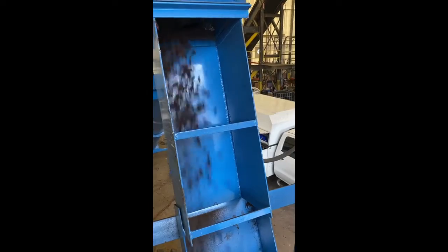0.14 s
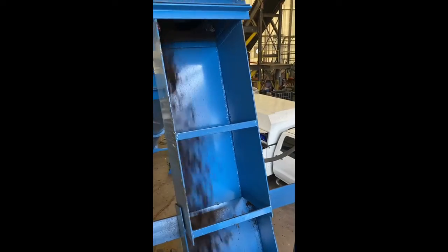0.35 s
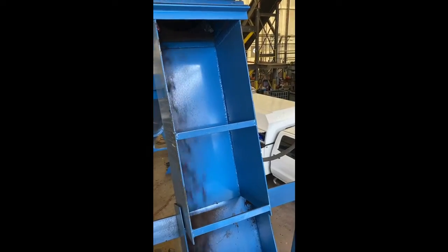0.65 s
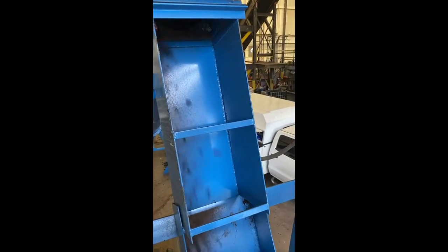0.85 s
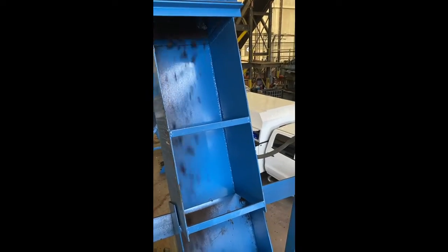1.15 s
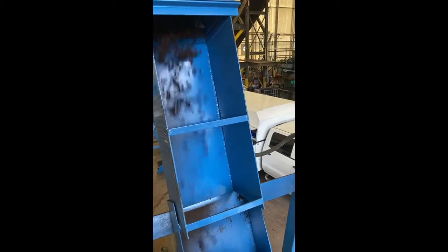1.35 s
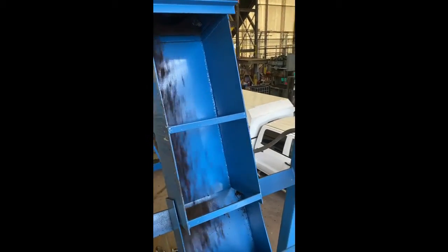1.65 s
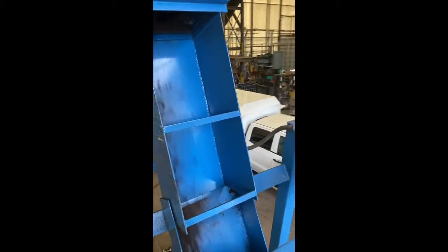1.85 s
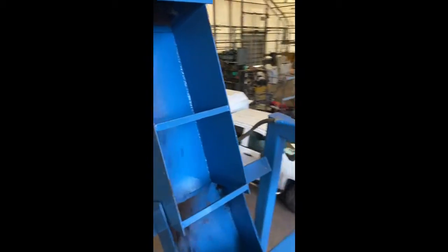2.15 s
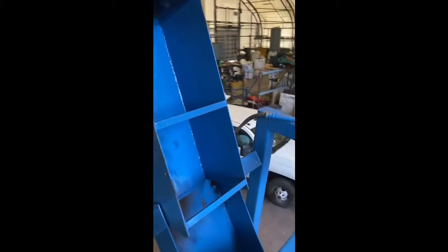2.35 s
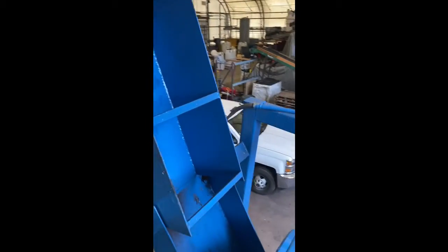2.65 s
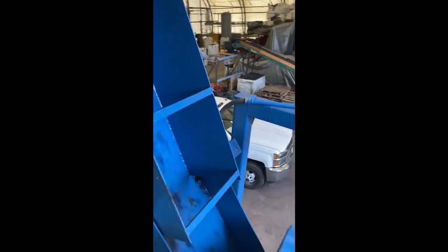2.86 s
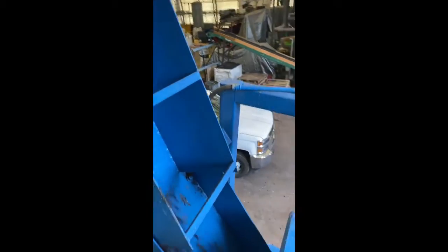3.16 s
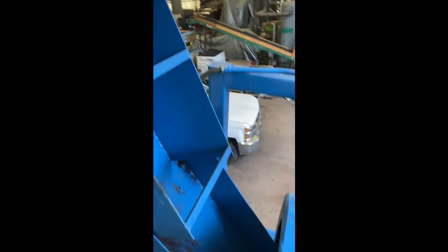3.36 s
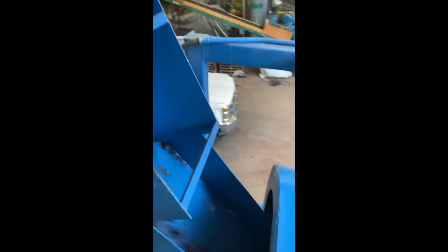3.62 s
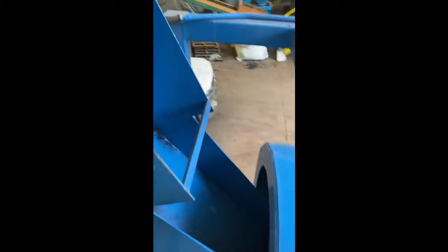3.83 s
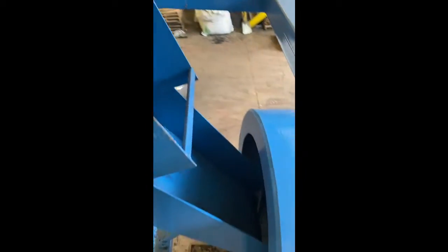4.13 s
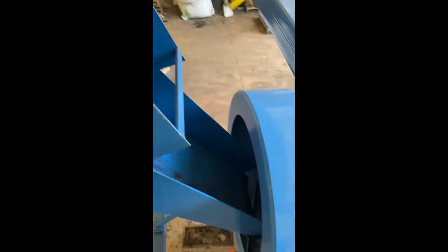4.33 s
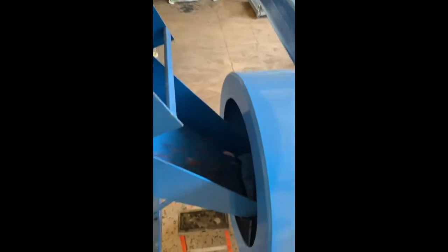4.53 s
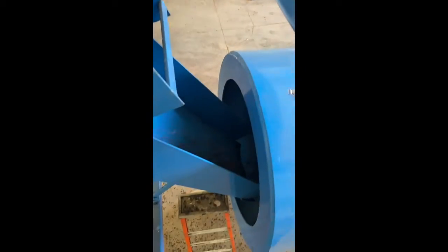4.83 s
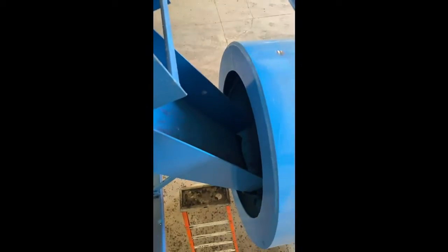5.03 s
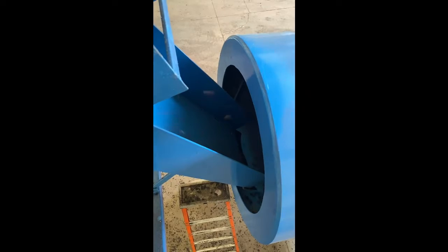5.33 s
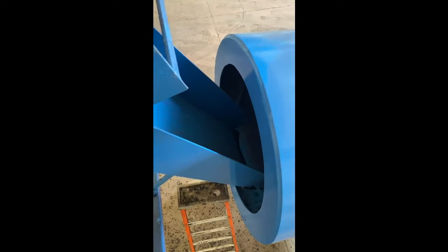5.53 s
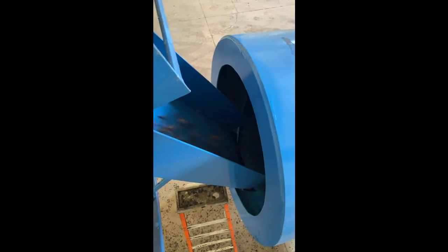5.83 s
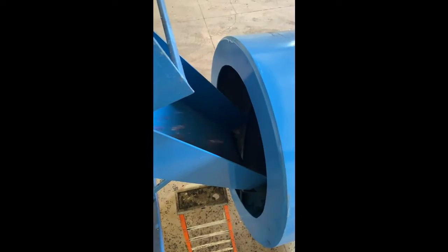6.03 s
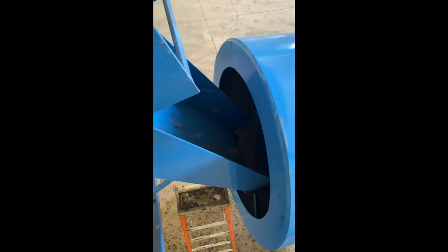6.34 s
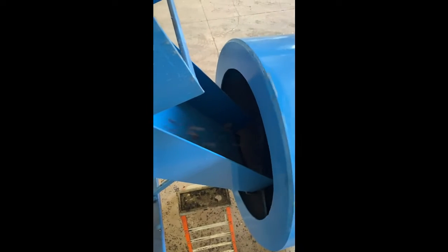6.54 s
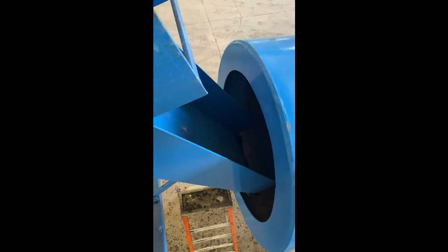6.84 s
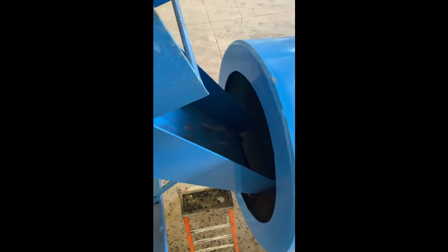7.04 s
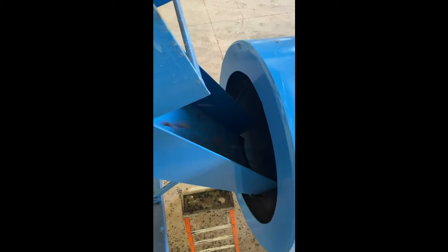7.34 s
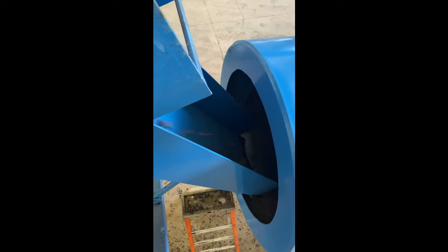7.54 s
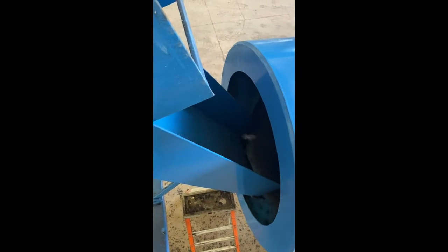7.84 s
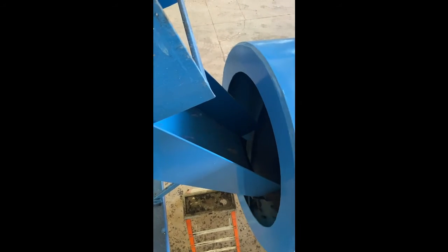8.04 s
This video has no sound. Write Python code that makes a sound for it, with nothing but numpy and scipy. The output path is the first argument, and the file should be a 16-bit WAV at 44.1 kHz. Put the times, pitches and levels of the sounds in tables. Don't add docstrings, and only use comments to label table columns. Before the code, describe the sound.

Inside a big steel hall, a heavy rotating drum and motors roar without pause, close to the microphone. Loose material spills on a steel chute in short hissing showers with constant fine rattling. Lumps clank early on, again just past the middle, and hardest near six seconds, each with a dry ring and short squeal. Thin whistles flicker between them. The microphone moves from chute to drum mouth, where grinding and hollow rumble grow slightly.

```python
import sys
import numpy as np
from scipy import signal
from scipy.fft import rfft, irfft, next_fast_len
from scipy.io import wavfile
from scipy.ndimage import uniform_filter1d

SR = 44100
rng = np.random.default_rng(int(sys.argv[2]) if len(sys.argv) > 2 else 0)


def inscribe(sig):
    pcm = np.round(np.clip(np.atleast_2d(sig).T, -1, 1) * 32767)
    wavfile.write(sys.argv[1], SR, pcm.astype(np.int16))


def nominal_scale(level):
    x = np.asarray(level, float) / 20
    return 10 ** x


N = 360738
SIZE = next_fast_len(N + SR)
HZ = np.arange(SIZE // 2 + 1) * SR / SIZE + 1e-3

# start in seconds, level in dB, loudest region in Hz, spread in octaves.
KNOCKS = [(0.577, -18, 3900, 0.11), (0.581, -24, 5050, .05), (0.594, -11, 4650, 0.044),
          (0.594, -22, 4400, 0.043), (0.593, -20, 3700, .05), (0.592, -22, 5500, .12),
          (0.592, -22, 5000, 1.1), (0.595, -14, 2650, 0.1), (0.622, -26, 4300, 0.24),
          (0.712, -14, 3700, .04), (0.712, -14, 5030, .04), (0.711, -27, 5900, .1), (0.710, -21, 9250, .03),
          (0.711, -28, 5000, 0.9), (0.821, -25, 6100, 0.41), (4.353, -27, 3600, 0.22),
          (4.405, -19, 3450, 0.24), (4.408, -11, 5340, 0.08), (4.409, -9, 4510, .05),
          (4.42, -14, 4510, .05), (4.404, -20, 9200, .15), (4.409, -9, 3500, 0.15), (4.409, -19, 4000, 1.6),
          (4.43, -17, 5360, .1), (4.426, -15, 3450, .2), (4.445, -17, 3100, .12), (4.494, -17, 3300, .08),
          (4.49, -27, 4500, .08), (6.397, -31, 4500, .4), (6.325, -24, 5050, .08), (6.324, -21, 4400, 0.75)]


def rms_one(x):
    return x / np.sqrt(np.mean(x ** 2) + 1e-20)


def in_time(rows):
    s, *columns = np.transpose(rows)
    return [np.interp(np.arange(N) / SR, s, c) for c in columns]


def at_hz(points):
    hz, value = np.transpose(points)
    return np.interp(np.log(HZ), np.log(hz), value)


def resonances_db(modes):
    return sum(db / (1 + (2 * (HZ - hz) / width) ** 2) for hz, width, db in modes)


def drift(hz):
    r = np.exp(-32 * np.pi * hz / SR)
    slow = signal.lfilter([1], [1, -2 * r, r * r], rng.standard_normal(N // 16 + 1002))[1000:]
    return np.interp(np.arange(N) / 16, np.arange(len(slow)), rms_one(slow))


def pair(two, gain):
    # frequency in Hz, unlike part minus common part in dB.
    alike = [(30, -38), (125, -40), (250, -23), (500, -10.5), (1000, -7.5), (2000, -6), (3000, -4),
             (4500, -3.5), (6000, -20), (7300, -21.5), (15000, -10)]
    unlike = nominal_scale(at_hz(alike))
    common, apart = rfft(two, SIZE) * (gain / np.sqrt(1 + unlike ** 2))
    return irfft(np.array([common + apart * unlike, common - apart * unlike]), SIZE)[:, :N]


def machine_noise(spectrum, flicker_db):
    # frequency in Hz, width in Hz, height in dB.
    shell = [(82, 12, 4), (134, 9, 7), (172, 8, 7), (199, 7, 8), (214, 5, 5), (248, 9, 6), (306, 7, 7),
             (347, 6, 8), (391, 6, 7), (436, 9, 4), (490, 40, -3), (575, 35, 5), (668, 25, 6), (860, 30, 3),
             (1003, 30, 4), (1180, 50, 3), (2300, 90, 2.5), (3680, 110, 3.5), (4100, 120, 3.5)]
    gain = nominal_scale(at_hz(spectrum) + resonances_db(shell))
    noise = rms_one(pair(rng.standard_normal((2, N)), gain))
    return noise * nominal_scale(flicker_db * drift(10.7))


def layer_gain(mean_db, share, near_db, centre_hz):
    # time in seconds, level in dB.
    churn = [(0.0, -23.5), (0.7, -22), (0.91, -23), (1.62, -22), (3.03, -22.5), (3.65, -21.5),
             (4.26, -22.5), (4.37, -19.5), (4.47, -22.5), (4.81, -23), (4.94, -21), (5.63, -22.5),
             (6.13, -22.5), (6.47, -20), (7.15, -22.5), (7.54, -24), (7.88, -24), (8.18, -23.5)]
    # middle in seconds, width in seconds, level in dB, loudest region in Hz.
    heaps = [(0.998, 0.042, -8, 300), (1.25, 0.07, -1, 2500), (2.65, 0.035, 6, 696), (3.3, 0.17, 1.5, 1090),
             (3.65, .15, 1, 1000), (4.0, 0.28, 3, 170), (5.15, 0.052, -6, 300), (7.1, 0.22, 2, 780),
             (3.5, 0.18, -1, 3500), (7.72, 0.069, 4.5, 181), (.8, 0.22, 1, 190), (2.5, .15, -5, 388),
             (4.35, 0.053, 0, 200), (7.6, 0.085, -0.5, 1100)]
    heap_octaves = 0.8
    churn_db, = in_time(churn)
    near, = in_time([(2.7, 0), (3.2, 1)])
    t = np.linspace(0, N / SR, num=1000)
    heaps_db = np.zeros(len(t))
    for s, width, db, hz in heaps:
        octaves_off = np.log2(hz / centre_hz) / heap_octaves
        heaps_db += db * np.exp(-((t - s) / width) ** 2 - octaves_off ** 2)
    swell_db, = in_time(np.transpose([t, heaps_db]))
    return nominal_scale(mean_db + share * (churn_db - churn_db.mean()) + near_db * near + swell_db)


def drum_rumble():
    # frequency in Hz, level in dB per Hz.
    rumble = [(25, -50), (40, -10), (60, -2), (90, -0.5), (140, 0), (220, -1), (330, -4.5), (500, -9),
              (900, -67)]
    gain = layer_gain(mean_db=-24, share=0.5, near_db=0.4, centre_hz=166)
    return gain * machine_noise(rumble, flicker_db=0.5)


def drum_roar():
    # frequency in Hz, level in dB per Hz.
    roar = [(200, -9.5), (350, -6), (480, -0.5), (650, 0.5), (850, -3), (1200, -14), (2000, -57)]
    gain = layer_gain(mean_db=-28, share=0.63, near_db=0.67, centre_hz=600)
    return gain * machine_noise(roar, flicker_db=0.78)


def gear_noise():
    # frequency in Hz, level in dB per Hz.
    gears = [(500, -17.5), (800, -5), (1100, -0.5), (1500, -1.5), (2200, -5), (3000, -14.5), (4500, -35)]
    gain = layer_gain(mean_db=-28.5, share=0.78, near_db=2.0, centre_hz=1200)
    return gain * machine_noise(gears, flicker_db=1.26)


def sliding_material():
    # frequency in Hz, level in dB per Hz.
    slide = [(1200, -8), (2200, -2), (3200, -0.5), (4300, -1.5), (5500, -8), (7000, -15), (9000, -17),
             (12000, -42), (14000, -41), (15800, -50)]
    gain = layer_gain(mean_db=-32, share=0.44, near_db=0.07, centre_hz=3200)
    return gain * machine_noise(slide, flicker_db=1.05)


def motor_hum():
    # frequency in Hz, level in dB, middle in seconds, half width in seconds.
    crests = [(134, -36, 1.5, 1.0), (134, -36, 3.7, .8), (172, -34, 4.0, .6), (172, -37, 1.2, .8),
              (199, -35, 1.0, .7), (199, -35, 7.1, 1.0), (248, -40, 2.2, .5), (248, -39, 4.1, .4),
              (306, -36, .9, .8), (306, -34, 3.6, .8), (347, -37.5, 1.9, 1.2), (347, -35, 6.3, 1.8),
              (391, -36.5, 1.7, 1.0), (391, -40, 6, 1.2)]
    t = np.arange(N) / SR
    tones = {}
    for hz in sorted({row[0] for row in crests}):
        sway = nominal_scale(1.5 * drift(.8))
        tones[hz] = sway * np.sin(2 * np.pi * hz * t + .5 * drift(1.5))
    return sum(nominal_scale(db) * np.exp(-((t - s) / width) ** 4) * tones[hz] for hz, db, s, width in crests)


def grains(per_s, spread_db):
    sizes = nominal_scale(spread_db * np.minimum(rng.exponential(1, (2, N)), 5))
    sizes = sizes * rng.choice([-1, 1], (2, N))
    return rms_one(sizes * (rng.random((2, N)) < per_s / SR))


def rattle():
    pitches = np.geomspace(600, 7000, num=14)
    ring_cycles, tilt_db = 92, -4.5
    hits = grains(per_s=500, spread_db=3.5)
    dealt = rng.integers(0, len(pitches), N)
    out = 0
    for k, hz in enumerate(pitches):
        r, w = nominal_scale(-60 * hz / (ring_cycles * SR)), 2 * np.pi * hz / SR
        own_hits = hits * (dealt == k) + 1e-18
        soft = signal.lfilter([1, 0, -1], [1, -2 * r ** 3 * np.cos(w), r ** 6], own_hits)
        ring = signal.lfilter([1, 0, -1], [1, -2 * r * np.cos(w), r * r], soft)
        out = out + nominal_scale(tilt_db * np.log2(hz / 1000)) * rms_one(ring)
    return nominal_scale(-33.5) * rms_one(pair(out, 1))


def showers():
    # start in seconds, peak in dB, t60 in seconds.
    loads = [(0.4519, -33, 0.5), (0.5102, -32, 0.97), (0.5921, -25, 0.2), (0.7108, -32, 0.74),
             (0.822, -23, 0.26), (1.1294, -36, 0.54), (1.8744, -26, 0.49), (2.0524, -34, 0.65),
             (2.1755, -34.5, 0.83), (2.4428, -33.5, 0.56), (2.9994, -37, 1), (3.6262, -44, 0.6),
             (3.9908, -35.5, 0.5), (4.1784, -38, 0.93), (4.3445, -32, 0.48), (4.4044, -17.5, 0.3),
             (4.5794, -29.5, 0.57), (4.6758, -31, 0.79), (4.8359, -34, 0.7), (5.3613, -29, 1),
             (5.726, -29, 0.63), (6.135, -36, 0.33), (6.2921, -31, 0.5), (6.324, -19.5, 0.37),
             (6.4672, -31.5, 1), (6.6199, -27, 0.26), (6.9576, -29, 0.2), (7.199, -32, 0.46),
             (7.4917, -31, 0.41), (7.7258, -38, 0.5)]
    # start in seconds, peak in dB.
    ticks = [(1.34, -33), (1.567, -36), (3.199, -34), (2.401, -37), (2.837, -37), (3.4, -39), (3.439, -35),
             (4.857, -34), (7.361, -38), (3.715, -35), (5.04, -31), (5.314, -36), (6.0, -28), (6.04, -30),
             (6.396, -23), (6.816, -29), (6.859, -30.5), (6.904, -31), (2.53, -36), (4.732, -35),
             (5.634, -35), (7.225, -29), (7.18, -37), (7.406, -31), (7.636, -35)]
    # frequency in Hz, level in dB per Hz.
    colour = [(1500, 2.5), (3000, 4.5), (5000, 3.5), (7000, 0.5), (10000, 0), (13000, -5.5), (16000, -10)]
    load_rise_s, tick_rise_s, tick_t60_s = .0031, .0006, 0.05
    trickle_db = -49.5
    falls = [(*row, load_rise_s) for row in loads]
    falls += [(*row, tick_t60_s, tick_rise_s) for row in ticks]
    power, after = np.zeros(N), np.arange(SR) / SR
    for s, db, t60, rise in falls:
        part = power[int(s * SR):][:SR]
        burst = nominal_scale(2 * db - 120 * after / max(t60, .02)) * (1 - np.exp(-after / rise))
        part += burst[:len(part)]
    stray_db = -46 + 3.5 * np.clip(rng.standard_normal(N), -2, 2)
    strays = (rng.random(N) < 22.0 / SR) * nominal_scale(2 * stray_db)
    strays = signal.lfilter([1], [1, -np.exp(-1 / (0.0034 * SR))], strays + 1e-18)
    power = power + nominal_scale(2 * trickle_db) + strays
    hiss = rms_one(pair(grains(per_s=5000., spread_db=-1.0), nominal_scale(at_hz(colour))))
    return hiss * np.sqrt(power) * nominal_scale(0.9 * drift(40))


def bearing_whistles():
    # start in seconds, length in seconds, first pitch in Hz, last pitch in Hz, peak in dB.
    glides = [(0.548, 0.11, 8950, 8550, -36.5), (2.246, 0.42, 4080, 4000, -39),
              (3.004, .3, 4070, 4070, -40), (3.26, 0.28, 3650, 3700, -38), (3.68, .11, 3700, 3660, -39),
              (3.515, .03, 3720, 3700, -33), (3.55, .06, 3700, 3680, -38), (3.92, .03, 4120, 4080, -36),
              (2.5, .04, 4250, 4310, -36), (2.55, .2, 3680, 3600, -40), (3.05, 0.18, 3720, 3920, -43),
              (4.05, .15, 4100, 4150, -48), (2.683, 0.098, 11600, 11300, -36),
              (2.71, 0.17, 10600, 10500, -42.5), (2.743, 0.05, 10350, 9900, -36),
              (5.324, 0.11, 7060, 8000, -37), (5.388, .11, 7950, 7200, -26), (5.93, 0.052, 4100, 4000, -26),
              (6, .03, 4080, 4060, -35), (6.044, .015, 4100, 4040, -30), (5.966, .016, 6050, 5950, -28),
              (5.982, 0.055, 5800, 5500, -30), (5.858, .025, 4080, 4080, -35), (6.07, .03, 3950, 3750, -33),
              (6.0, .035, 4900, 4750, -37), (6.038, 0.055, 5650, 5900, -36), (4.27, 0.037, 3650, 3600, -42),
              (4.311, 0.029, 4050, 4220, -39), (4.804, .06, 3700, 3720, -27)]
    glide_bend = .7
    core = .5
    out = np.zeros(N)
    breath = (core + .6 * (drift(330) + 1j * drift(330))) * nominal_scale(2.5 * drift(35))
    for s, length, first_hz, last_hz, db in glides:
        i = np.arange(int(s * SR), int((s + length) * SR))
        u = np.linspace(0, 1, len(i))
        phase = 2 * np.pi * np.cumsum(first_hz + (last_hz - first_hz) * u ** glide_bend) / SR
        swell_db = np.interp(u, [0, 0.11, 1], [-1, 0, -2.5])
        edges = np.minimum(1, 12 * np.minimum(u, 1 - u))
        out[i] += edges * nominal_scale(db + swell_db) * np.real(breath[i] * np.exp(1j * phase))
    return out


def ringing_sheet():
    # frequency in Hz, level in dB, t60 in seconds.
    sheet = [(2540, -3, 0.039), (3072, -3, 0.1), (3304, -7.5, 0.058), (3555, -3, 0.076), (3700, -7, 0.068),
             (4050, -14, 0.03), (4400, 1, 0.045), (4510, -1, 0.054), (4650, -4, 0.034), (5050, -3, 0.041),
             (5390, 2, 0.04), (5900, 0, 0.035), (6360, -7, 0.045), (6740, 1, .05), (7700, -1, .04),
             (8670, -0.5, 0.062), (9250, -6, .05), (11300, -11, .04)]
    s, db, centre_hz, octaves = np.transpose(KNOCKS)
    starts = (s * SR).astype(int)
    chance_db = rng.normal(0, 1.5, (len(s), len(sheet)))
    out, t = np.zeros(N), np.arange(SR // 20) / SR
    for k, (hz, level_db, t60) in enumerate(sheet):
        force = np.zeros(N)
        off_region = np.log2(hz / centre_hz) / octaves
        strength = nominal_scale(db + level_db + chance_db[:, k] - 8.0 * off_region ** 2)
        for start, gain, scuff in zip(starts, strength, rng.standard_normal((len(s), len(t)))):
            scuff = scuff * np.exp(-t / 0.0055)
            push = abs(scuff @ np.exp(2j * np.pi * hz * t))
            force[start:start + len(t)] += gain * scuff / np.hypot(push, 5.0)
        r, w = nominal_scale(-60 / (t60 * SR)), 2 * np.pi * hz / SR
        out += signal.lfilter([0, np.sin(w)], [1, -2 * r * np.cos(w), r * r], force + 1e-18)
    return out


def crumbling_lumps():
    crunch_db, crunch_s, crunch_octaves = -14, 0.024, 0.3
    out, t = np.zeros(N), np.arange(SR // 8) / SR
    for (s, db, centre_hz, octaves), grit in zip(KNOCKS, rng.standard_normal((len(KNOCKS), len(t)))):
        edges = centre_hz * 2. ** (np.array([-1, 1]) * (crunch_octaves + octaves / 2))
        band = signal.butter(2, edges, "band", fs=SR, output="sos")
        grit = rms_one(signal.sosfilt(band, grit))
        decay = np.exp(-t / crunch_s) * np.minimum(1, t / .002)
        out[int(s * SR):][:len(t)] += nominal_scale(db + crunch_db) * grit * decay
    return out


def squeaks():
    # start in seconds, length in seconds, pitch in Hz, pitch change in %, level in dB.
    bites = [
        (0.8105, 0.022, 2484, 1, -11.5),
        (0.831, .03, 2485, 0, -27),
        (4.399, 0.022, 2320, -4, -12),
        (6.315, 0.027, 2330, -3, -9.5),
        (6.342, 0.022, 2240, 0, -27),
        (6.374, 0.022, 2270, -1, -32),
    ]
    # start in seconds, length in seconds, pitch in Hz, pitch change in %, level in dB.
    squeals = [(0.586, 0.03, 2410, 0, -26), (0.612, 0.028, 2380, -3.5, -26), (0.636, .018, 2380, -2, -26),
               (0.708, 0.02, 2450, 0.5, -25), (0.728, .018, 2420, 0, -28), (0.752, 0.018, 2465, 1, -27),
               (0.838, 0.08, 2495, 0, -18.5), (0.912, 0.056, 2490, -.5, -21), (.985, 0.018, 2480, 0.5, -33),
               (1.05, .02, 2440, -4.5, -33), (4.349, 0.03, 2420, -1, -26), (4.38, .018, 2380, 0, -32),
               (4.426, .014, 2300, 3, -22), (4.436, 0.03, 2430, -1, -20), (4.445, .03, 2270, 0, -25),
               (4.478, .025, 2300, -1, -27), (4.463, 0.051, 2420, -3, -24), (4.508, .024, 2260, -3, -33),
               (6.432, .035, 2260, 0, -36), (4.641, 0.023, 2410, 1, -19), (4.695, 0.021, 2480, 0, -26),
               (4.732, 0.031, 2500, 0, -31)]
    # multiple of the pitch, level in dB.
    overtone_levels = [(2, -1), (3, -13), (4, -21.5), (5, -22)]
    slip_roughness = .15
    beat_hz, beat_top_s, beat_depth, beat_until_s = 54.5, .868, .5, 1.1
    slips = [(*row, 3 + 1.0 * row[3]) for row in bites]
    slips += [(*row, -23 + .6 * (row[4] + 20)) for row in squeals]
    out, t = np.zeros(N), np.arange(N) / SR
    wobble = 1 + .005 * drift(150)
    flutter = nominal_scale(1.2 * np.array([drift(80), drift(110)]))
    flutter = flutter * (1 + slip_roughness * (drift(130) + drift(260)) / np.sqrt(2))
    beat = 2 * np.pi * beat_hz * (t - beat_top_s)
    beating = np.array([np.cos(beat), -np.cos(2 * beat)]) * (np.arange(N) < beat_until_s * SR)
    flutter = flutter * (1 + beat_depth * beating)
    for s, length, hz, change, db, over_db in slips:
        i = np.arange(int(s * SR), int((s + length) * SR))
        u = np.linspace(0, 1, len(i))
        phase = 2 * np.pi * np.cumsum(hz * (1 + change * u / 100) * wobble[i]) / SR
        overtones = sum(nominal_scale(over_db + level_db) * np.sin(k * phase) for k, level_db in overtone_levels)
        overtones = overtones * nominal_scale(-70.0 * u * length)
        edges = np.minimum(1, np.minimum(u / .007, (1 - u) / .008) * length)
        edges = edges * nominal_scale(-15.0 * u * length)
        out[i] += nominal_scale(db) * edges * (flutter[0, i] * np.sin(phase) + flutter[1, i] * overtones)
    return out


def hall(x):
    t, echoes = np.arange(SR) / SR, rng.standard_normal((2, 2, SR))
    low = signal.sosfilt(signal.butter(2, 3000, "low", fs=SR, output="sos"), echoes[0])
    high = signal.sosfilt(signal.butter(2, 3000, "high", fs=SR, output="sos"), echoes[1])
    tail = low * nominal_scale(-60 * t / 0.45) + high * nominal_scale(-7.5 - 60 * t / .42)
    tail = tail * (t > .006)
    return pair(tail / np.sqrt(np.sum(tail[0] ** 2)), rfft(x, SIZE))


def drum_mouth():
    # frequency in Hz, width in Hz, level in dB.
    air_modes = [(178, 14, 0), (198, 8, 0), (250, 12, -4), (347, 5, -9), (435, 10, -10), (575, 25, -9),
                 (665, 25, -6)]
    gain = sum(nominal_scale(db) / (1 + (2 * (HZ - hz) / width) ** 2) for hz, width, db in air_modes)
    facing, = in_time([(4.9, 0), (5.6, 1)])
    return nominal_scale(-32) * facing * rms_one(pair(rng.standard_normal((2, N)), gain))


def scene():
    machines = drum_rumble() + drum_roar() + gear_noise() + motor_hum() + drum_mouth()
    material = sliding_material() + rattle() + showers()
    steel = bearing_whistles() + ringing_sheet() + crumbling_lumps() + squeaks()
    direct = steel * nominal_scale(np.array([[.1], [-.1]]))
    return machines + material + direct + nominal_scale(-11) * hall(steel)


def low_pass(x):
    return signal.sosfilt(signal.butter(12, 17110, fs=SR, output="sos"), x)


def record(dry):
    # frequency in Hz, lead in radians.
    lead_table = [(30, 0.), (350, -.1), (1200, -.4), (1900, .15), (3000, .5), (5000, .65), (6000, 1.6),
                  (7400, 3.14), (10550, 6.28), (13600, 9.42), (16300, 12.5)]
    # frequency in Hz, left minus right in dB.
    balance = [(150, 0), (500, 1.2), (1000, .3), (2000, -.2), (4000, -.4), (8000, 0)]
    low_hz, top_hz = 34, 15800
    lead = np.interp(HZ, *np.transpose(lead_table))
    left_right = np.array([[.5], [-.5]])
    ports = np.exp(1j * lead * left_right) * nominal_scale(at_hz(balance) * left_right)
    ports = ports * (HZ < top_hz) / np.sqrt(1 + (low_hz / HZ) ** 6)
    x = irfft(rfft(dry, SIZE) * ports, SIZE)[:, :N]
    creep = 6.4 * np.arange(N) / SR
    level_db = 10 * np.log10(uniform_filter1d(np.mean(x ** 2, axis=0), size=441) + 1e-12)
    held_db = np.maximum.accumulate(level_db + creep) - creep
    over_db = np.maximum(held_db + 15.0, 0)
    r = np.exp(-1 / (.014 * SR))
    x = x * nominal_scale(-.75 * signal.lfilter([1 - r], [1, -r], over_db))
    return low_pass(x)


dry = scene()
out = record(dry)
inscribe(out)
```